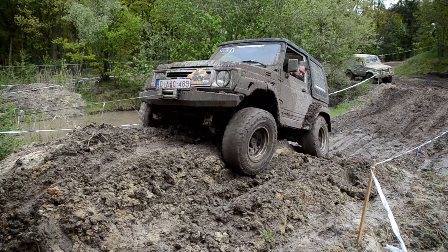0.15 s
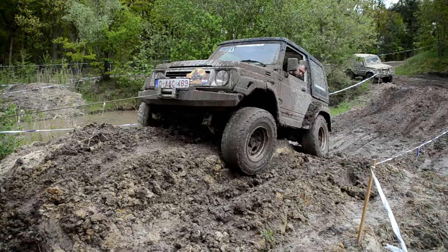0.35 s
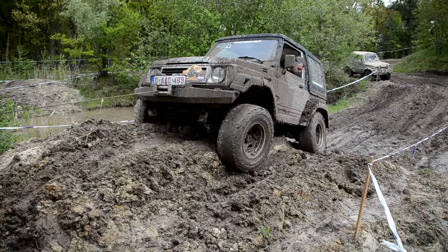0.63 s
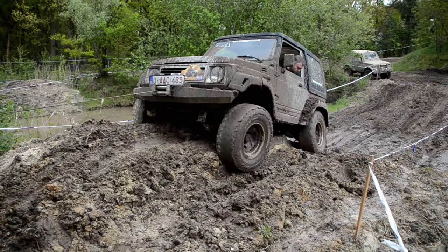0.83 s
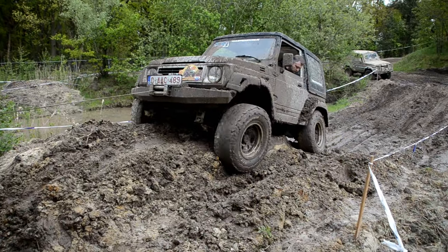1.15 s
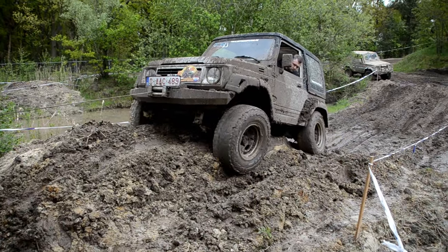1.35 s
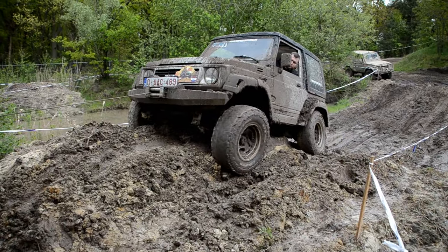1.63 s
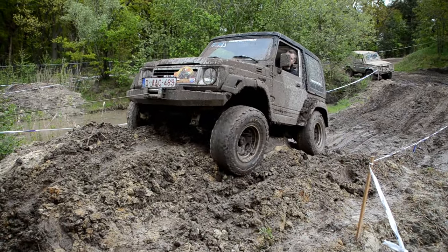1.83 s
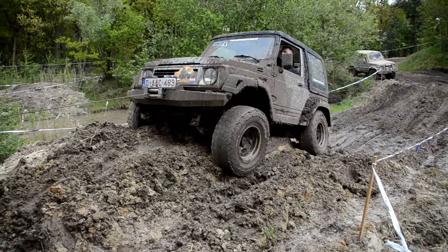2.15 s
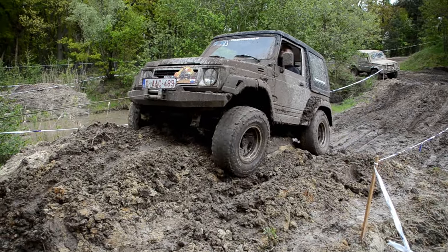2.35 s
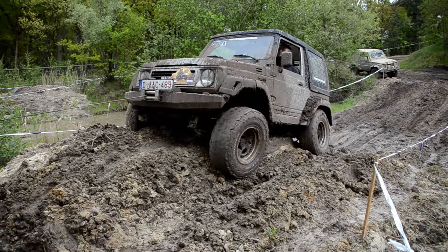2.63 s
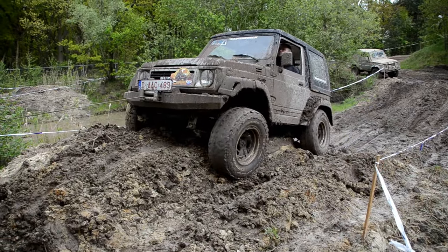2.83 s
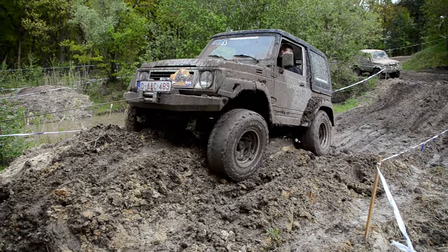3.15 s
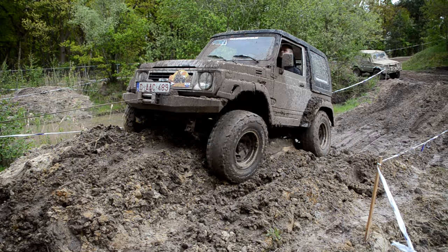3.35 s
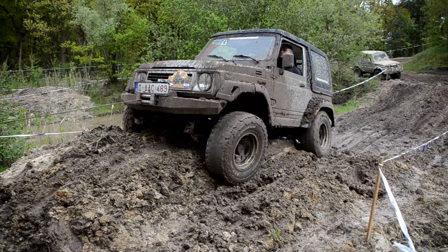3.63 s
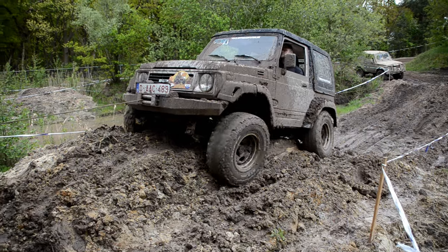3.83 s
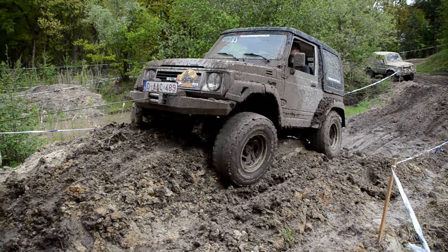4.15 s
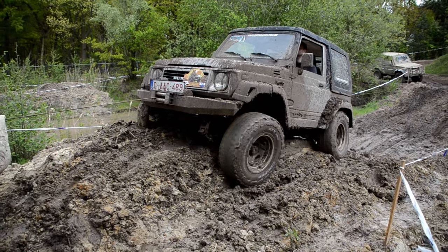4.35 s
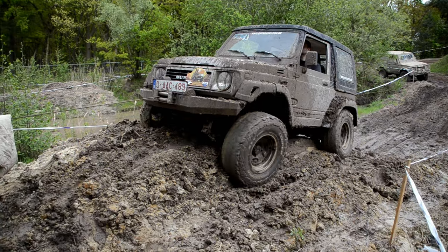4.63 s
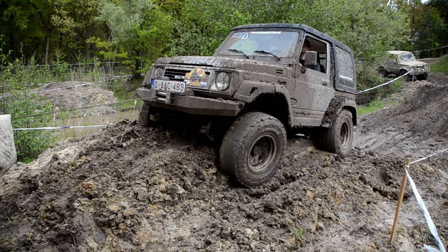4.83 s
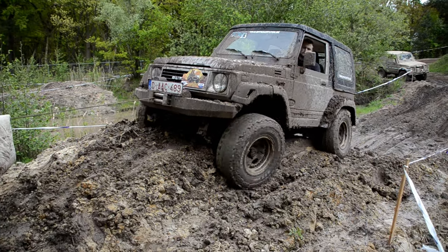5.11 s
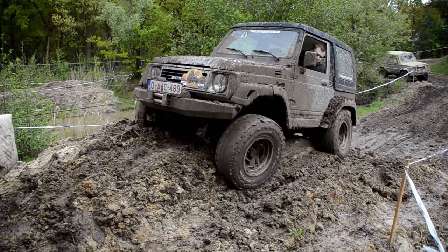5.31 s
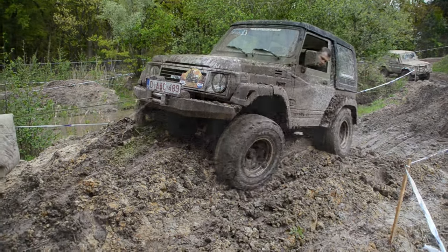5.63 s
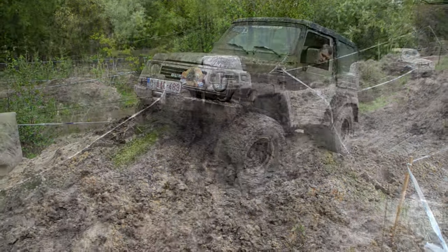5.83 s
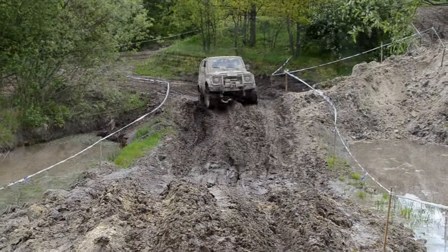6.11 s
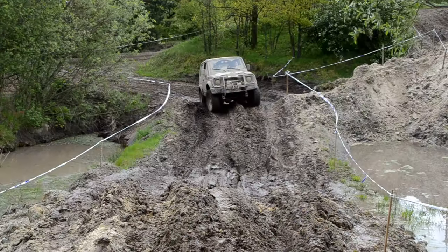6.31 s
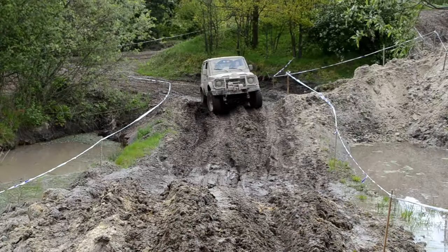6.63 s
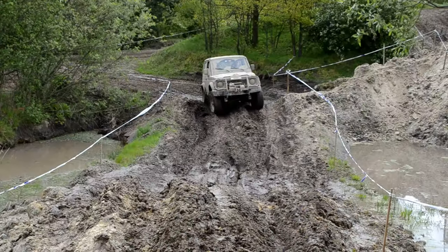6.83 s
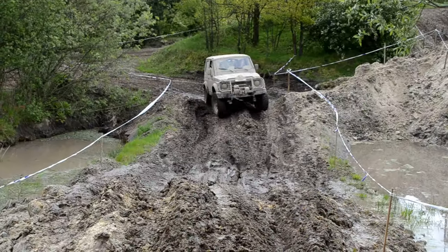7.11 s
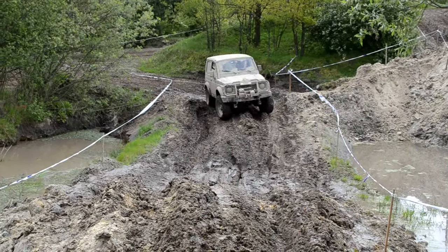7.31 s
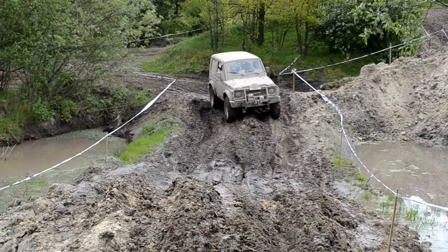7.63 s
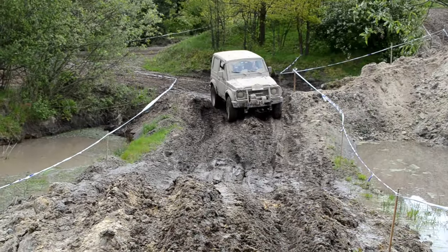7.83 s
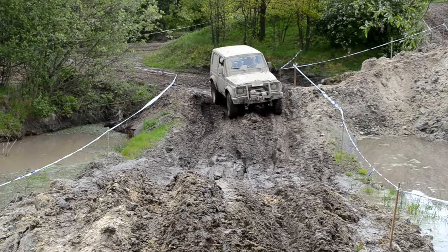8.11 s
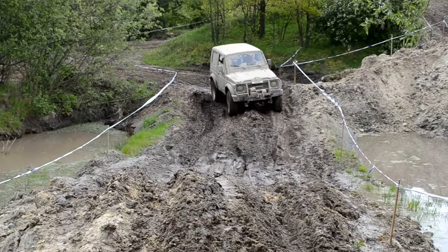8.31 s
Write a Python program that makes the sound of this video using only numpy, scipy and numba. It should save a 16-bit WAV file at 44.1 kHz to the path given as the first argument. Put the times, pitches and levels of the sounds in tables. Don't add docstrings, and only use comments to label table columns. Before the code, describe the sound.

A nearby engine labours on a mud bank, buzzing and clattering with gassy exhaust roar. Crackling pops crowd the first second and a half, then thin out as the pitch sinks and steadies. A thin belt squeal precedes a dissolve to a quieter, more distant vehicle coasting, revving twice with hissing wet mud, easing off and pulling again. Open-air sound through a boxy camera microphone with automatic gain; no speech.

```python
import sys
import numpy as np
from scipy import signal
from scipy.fft import rfft, irfft, next_fast_len
from scipy.io import wavfile
from scipy.ndimage import uniform_filter1d
from numba import njit

SR = 44100
rng = np.random.default_rng(int(sys.argv[2]) if len(sys.argv) > 2 else 0)


def store_pcm(level_fs):
    pcm = np.round(np.clip(level_fs, -1, 1) * 32767).astype(np.int16)
    wavfile.write(sys.argv[1], SR, np.atleast_2d(pcm).T)


def amplitude_ratio(level_db):
    exponent = np.asarray(level_db, float) / 20
    return 10 ** exponent


N = 373527
T = np.arange(N) / SR

# suction_db, suction_place, pressure_db, pressure_place
CYLINDERS = [
    (-2, .38, -12, .05),
    (-6, 1.43, -6, .97),
    (0, 2.4, -14, 2.),
    (-1, 3.47, -5, 3.02),
]


def curves(table):
    s, *columns = np.transpose(table)
    return [np.interp(T, s, c) for c in columns]


def unit(x):
    return x / np.sqrt(np.mean(x ** 2))


def walk(rate):
    hold = int(SR / rate)
    steps = np.repeat(rng.standard_normal(N // hold + 1), hold)
    return 1.3 * uniform_filter1d(uniform_filter1d(steps, hold), hold)[:N]


def band(x, colour, lo_hz, hi_hz):
    # frequency_hz, gain_db
    microphone = [(3700, 3.5), (4200, -3.5), (4800, -16.5), (5300, -11), (6200, -6), (6700, -17),
                  (7100, -26), (8000, -25), (8900, -19), (10000, -25), (12000, -32.5), (16000, -29)]
    size = next_fast_len(N)
    log_hz = np.log(np.maximum(np.arange(size // 2 + 1) * SR / size, 1))
    gain_db = 0
    for response in (colour, microphone):
        hz, db = np.transpose(response)
        gain_db = gain_db + np.interp(log_hz, np.log(hz), db)

    def edge(hz):
        return np.clip((log_hz - np.log(hz)) / 0.3 + 0.5, 0, 1)

    window = np.sqrt(np.maximum(edge(lo_hz) - edge(hi_hz), 0))
    return irfft(rfft(x, size) * amplitude_ratio(gain_db) * window, size)[:N]


def roar(colour, span_hz, gate, flicker_db):
    noise = gate * rng.standard_normal(N)
    lo_hz, hi_hz = span_hz
    hz = np.geomspace(lo_hz, hi_hz, int(2 * np.log2(hi_hz / lo_hz)) + 1)
    return sum(amplitude_ratio(flicker_db * walk(12)) * band(noise, colour, a, b) for a, b in zip(hz, hz[1:]))


def lines(table, orders, rough):
    silencer_hz, silencer_db_per_hz = 74, 0.6
    hz, level_db = curves(table)
    phase = 2 * np.pi * np.cumsum(hz * (1 + 0.0121 * rough * walk(30))) / SR
    start_s, end_s = table[0][0], table[-1][0] + 0.03
    fade = np.clip(np.minimum(T - start_s, end_s - T) / 0.06, 0, 1)
    tones = 0
    for k, db in orders:
        cut_db = silencer_db_per_hz * np.minimum(k * hz - silencer_hz, 0)
        tones = tones + amplitude_ratio(db + cut_db + 2 * rough * walk(13)) * np.sin(k * phase + k * k)
    return np.sqrt(2) * fade * amplitude_ratio(level_db) * tones


def crank_orders(turn, crank_hz, fast):
    # multiple, level_db
    orders_slow = [(.5, -38), (1, -14), (1.5, -25), (2, 0), (2.5, -20), (3, -29), (3.5, -25), (4, -8),
                   (4.5, -27), (5, -6), (5.5, -12), (6, -6), (6.5, -21), (7, -14), (7.5, -10), (8, -8),
                   (8.5, -12), (9, -15), (9.5, -15), (10, -23), (10.5, -24), (11, -12), (11.5, -13),
                   (12, -14)]
    # multiple, level_db
    orders_fast = [(0.5, -36), (1, -13), (1.5, -22), (2, 0), (2.5, -24), (3, -12), (3.5, -21), (4, -17),
                   (4.5, -21), (5, 0), (5.5, -19), (6, -12), (6.5, -18), (7, -9), (7.5, -19), (8, -7),
                   (8.5, -15), (9, -13), (9.5, -21), (10, -16), (10.5, -23), (11, -19), (11.5, -16),
                   (12, -18)]
    # centre_hz, width_hz, lift_db
    pipes = [
        (650, 21, 2),
        (548, 30, 6.5),
    ]
    suck_db, suck_at, push_db, push_at = np.transpose(CYLINDERS)
    tones = 0
    for (k, slow_db), (_, fast_db) in zip(orders_slow, orders_fast):
        pressure = amplitude_ratio(push_db) * np.exp(-1j * k * np.pi * push_at)
        suction = amplitude_ratio(suck_db) * np.exp(-1j * k * np.pi * suck_at)
        start_phase = np.angle((pressure - suction).sum())
        wobble = min(k / 8, 1)
        db = slow_db + fast * (fast_db - slow_db) + (0.3 + 1.3 * wobble) * walk(9)
        for hz, width, lift in pipes:
            db = db + lift * np.exp(-((k * crank_hz - hz) / width) ** 2)
        tones = tones + amplitude_ratio(db) * np.cos(k * turn + start_phase + 0.25 * wobble * walk(11))
    return tones


def gear_whine(turn, crank_hz):
    teeth, case_hz, case_width_hz, whine_db = 20, 1314, 24, -26
    resonance = np.exp(-((teeth * crank_hz - case_hz) / case_width_hz) ** 2)
    return amplitude_ratio(whine_db + 3 * walk(25)) * resonance * np.sin(teeth * turn + 0.5 * walk(30))


def blows(turn, scatter_db, jitter):
    # frequency_hz, level_db
    blow_colour = [(600, -5), (680, 6.5), (760, -3), (860, 4.5), (1000, -18), (1200, 4), (1450, -1.5),
                   (1800, -8.5), (2200, -21)]
    count = np.arange(4, int(turn[-1] / np.pi) - 4)
    blow_db, late = np.array(CYLINDERS)[count % 4, :2].T
    lag_chance, size_chance = rng.standard_normal((len(count), 2)).T
    angle = np.pi * (count - count % 4 + late + jitter * lag_chance)
    place = np.interp(angle, turn, np.arange(N))
    size = amplitude_ratio(blow_db + scatter_db * size_chance)
    whole, part = place.astype(int), place % 1
    pulses = np.bincount(whole, size * (1 - part), N) + np.bincount(whole + 1, size * part, N)
    t = np.arange(int(0.007 * SR)) / SR
    rattle = signal.chirp(t, 2700, t[-1], 400) * signal.windows.tukey(len(t), 0.2)
    return unit(band(signal.fftconvolve(pulses, rattle)[:N], blow_colour, 530, 3100))


def panels(gate):
    # centre_hz, width_hz, level_db
    modes = [(856, 87, -16), (1200, 46, -19.5), (1414, 60, -14.5), (1543, 62, -18), (1833, 81, -17),
             (3647, 90, -27)]
    shake = gate * rng.standard_normal(N)
    hum = 0
    for hz, width, db in modes:
        b, a = signal.iirpeak(hz, hz / width, SR)
        ring = signal.lfilter(b, a, signal.lfilter(b, a, shake))
        hum = hum + amplitude_ratio(db + 3.2 * walk(2.9)) * unit(ring)
    return hum


def near_engine():
    # time_s, crank_hz, load_db
    near = [(0.0, 60.9, -20.5), (0.5, 62.72, -22.5), (0.78, 65.1, -18.5), (1.05, 66.02, -16),
            (1.31, 59.48, -21.5), (1.6, 54.73, -21), (1.85, 52.8, -19.5), (2.28, 53.78, -20.5),
            (2.47, 54.37, -16.5), (2.86, 54.46, -17), (3.3, 55.28, -18.5), (3.75, 55.62, -17),
            (4.13, 54.95, -20), (4.4, 55.15, -20.5), (4.65, 54.42, -19), (4.9, 55.3, -20.5),
            (5.28, 57.85, -20), (6.2, 59, -21)]
    # frequency_hz, level_db (per Hz)
    near_colour = [(30, -22), (45, -29), (110, -11), (167, -19.5), (210, -14), (330, -12), (430, -7.5),
                   (600, -8), (780, -12.5), (1420, -17), (2130, -19.5), (3660, -27), (6000, -28),
                   (16000, -30.5)]
    slow_hz, fast_hz, idle_load_db = 55.8, 64.4, -20
    crank_hz, tone_db = curves(near)
    turn = 2 * np.pi * np.cumsum(crank_hz * (1 + 0.002 * walk(25))) / SR
    fast = np.clip((crank_hz - slow_hz) / (fast_hz - slow_hz), 0, 1)
    load_db = tone_db - idle_load_db
    roar_db = -24 + 0.43 * load_db + 2.5 * fast
    hiss_db = -34.5 + 0.72 * load_db + 0.7 * fast
    tones = amplitude_ratio(tone_db) * crank_orders(turn, crank_hz, fast) + gear_whine(turn, crank_hz)
    gate = 1 + 0.17 * np.cos(2 * turn - 2.6) + 0.16 * np.cos(turn)
    low = amplitude_ratio(-3.5) * unit(roar(near_colour, (25, 700), gate, flicker_db=1.5))
    mid = amplitude_ratio(-3.0) * unit(roar(near_colour, (700, 2200), gate, flicker_db=0.4))
    mid = mid + amplitude_ratio(-5) * blows(turn, scatter_db=2.5, jitter=0.008)
    mid = mid + panels(gate)
    high = unit(roar(near_colour, (2200, 17000), gate, flicker_db=1.0))
    return np.sqrt(2) * tones + amplitude_ratio(roar_db + 3.0) * (low + mid) + amplitude_ratio(hiss_db + 2.0) * high


def pops():
    # start_s, crack_db, body_db (relative to crack)
    bursts = [(0.0672, -36, -7), (0.131, -25.5, 6.5), (0.177, -34.5, 12), (0.2069, -30.5, 10),
              (0.272, -27.5, 9.5), (0.3948, -28.5, 11.5), (0.4193, -35.5, 9), (0.5237, -33, 6.5),
              (0.5735, -38, 7), (0.6225, -31, 9), (0.6644, -34, 1), (0.784, -31.5, 9), (0.825, -31, 9.5),
              (0.8622, -30.5, 18), (0.936, -28.5, 1), (1.0303, -32, 13.5), (1.044, -21.5, 4.5),
              (1.0814, -33, 11), (1.1263, -24.5, 3), (1.1797, -31.5, 16.5), (1.3606, -24, 4.5),
              (1.4063, -32.5, 6), (1.5204, -39, 16), (1.6337, -37, 14), (1.652, -29.5, 16),
              (2.0068, -32.5, 17), (4.1441, -24, 12.5), (5.527, -24, 6.5), (5.5777, -40, 9),
              (6.785, -55, 21)]
    # frequency_hz, level_db (per Hz)
    pop_colour = [(400, 7), (900, 12), (1700, 13.5), (3000, 0.5), (6000, 0), (10000, 8), (16000, -1)]
    thump_db, thump_per_size = -8, 0.9
    hz = np.geomspace(400, 17000, 9)
    t = np.arange(int(0.08 * SR)) / SR
    out = 0
    for lo, hi in zip(hz, hz[1:]):
        envelope = np.zeros(N)
        late_s, decay_s = 4.0 / lo, 0.0008 + 3.0 / lo
        burst = 1.8 * (1 - np.exp(-4 * t / decay_s)) * np.exp(-t / decay_s / 1.3)
        shape = burst + 0.24 * np.exp(-t / 0.011)
        for s, crack_db, body_db in bursts:
            low_db = body_db + thump_db + thump_per_size * (crack_db + 36)
            db = np.interp(np.log(lo), np.log([900, 3000, 7000]), [low_db - 16, body_db - 11, 0])
            i = int((s + late_s - 0.0004) * SR)
            envelope[i:i + len(t)] += amplitude_ratio(crack_db + db) * shape
        out = out + band(envelope * rng.standard_normal(N), pop_colour, lo, hi)
    return amplitude_ratio(15.5) * out


def belt_squeal():
    # time_s, pitch_hz, level_db
    squeal = [
        (4.67, 650.6, -53),
        (4.8, 652, -59),
        (5.02, 660, -53.5),
        (5.2, 631.9, -56),
    ]
    # multiple, level_db
    squeal_orders = [(8, 0), (9, 2), (10, -4)]
    return lines(squeal, squeal_orders, rough=0.15)


def far_roar():
    # time_s, effort_db
    far = [(5.6, -8), (6.09, 0), (6.27, 4.5), (6.48, 2), (6.68, 1), (6.84, 3), (7.0, -0.5), (7.2, -3),
           (7.9, -3.5), (8.1, -.5), (8.47, 2.5)]
    # frequency_hz, level_db (per Hz)
    far_colour = [(25, -26), (45, -24), (70, -3), (90, -9.5), (230, -9.5), (540, -12.5), (1000, -16),
                  (1900, -24.5), (2300, -25.5), (3500, -39), (4300, -31), (5800, -38.5), (7500, -29),
                  (16000, -50)]
    # low_hz, high_hz, level_db, slope (dB per dB of effort), flicker_db
    layers = [
        (20, 556.4, -31, 1.2, 1.5),
        (551, 1100, -31.5, 1.15, 0.5),
        (1102, 2200, -30.5, 0.77, 1.),
        (2260, 5240, -40, 1, .6),
        (4785, 19000, -60.5, 1, 1.5),
    ]
    spray_s, spray_width_s, spray_db = 6.32, 0.26, -51
    effort_db, = curves(far)
    gate = amplitude_ratio(0.88 * walk(150))
    noise = 0
    for lo, hi, db, slope, flicker_db in layers:
        noise = noise + amplitude_ratio(db + slope * effort_db) * unit(roar(far_colour, (lo, hi), gate, flicker_db))
    spin = np.exp(-((T - spray_s) / spray_width_s) ** 2)
    spray = spin * unit(roar(far_colour, (4000, 11000), gate, flicker_db=1.2))
    return noise + amplitude_ratio(spray_db) * spray


def far_tones():
    # time_s, pitch_hz, level_db
    coasting = [
        (5.95, 238, -37),
        (6.1, 235.6, -32),
        (6.25, 217, -36),
    ]
    # time_s, firing_hz, level_db
    blip_a = [
        (6.1, 58, -40),
        (6.2, 70, -30),
        (6.3, 79.7, -24.5),
        (6.47, 82, -25.5),
        (6.63, 78.2, -26.5),
        (6.74, 73.1, -33),
        (6.9, 70.1, -31),
        (7.02, 64.8, -31.5),
        (7.25, 58, -44),
    ]
    # time_s, firing_hz, level_db
    blip_b = [
        (6.62, 70.1, -45),
        (6.8, 76.9, -33),
        (6.89, 79, -30),
        (6.97, 74.6, -32),
        (7.1, 62.2, -60),
    ]
    # time_s, pitch_hz, level_db
    squeak = [
        (6.76, 1300, -36),
        (6.85, 1345, -36),
        (6.93, 1375, -44),
    ]
    # time_s, pitch_hz, level_db
    gears = [
        (6.9, 890, -41),
        (7.03, 775, -33),
        (7.13, 712, -36),
    ]
    # time_s, firing_hz, level_db
    blip_c = [
        (7.95, 117, -44),
        (8.04, 109.7, -36.5),
        (8.25, 112.2, -39.5),
        (8.36, 124.7, -34),
        (8.47, 130, -43),
    ]
    # multiple, level_db
    loaded = [(1, 1.5), (2, -5.5), (3, -12.5), (4, -13)]
    revved = [(2, -11), (3, 1), (4, -5), (5, -7)]
    pulling = [(1, -9), (2, 1), (3, -7), (4, -12)]
    tones = lines(coasting, [(1, 0)], rough=0.6)
    tones = tones + lines(blip_a, loaded, rough=0.6)
    tones = tones + lines(blip_b, revved, rough=0.6)
    tones = tones + lines(squeak, [(1, 0), (1.37, -4)], rough=0.5)
    tones = tones + lines(gears, [(1, 0)], rough=0.8)
    return tones + lines(blip_c, pulling, rough=0.9)


def scene():
    dissolve_start_s, dissolve_end_s = 5.365, 6.22
    share = np.clip((T - dissolve_start_s) / (dissolve_end_s - dissolve_start_s), 0, 1)
    near = near_engine() * (1 - share) ** 0.79 + pops() + belt_squeal()
    return (near + far_roar() * share + far_tones())[None]


@njit
def limiter(x, top, attack, release):
    gain, e = np.empty(len(x)), 0.
    for i in range(len(x)):
        e += (abs(x[i]) - e) * (attack if abs(x[i]) > e else release)
        gain[i] = min(1., top / (e + 1e-9))
    return gain


def low_pass(x):
    return signal.sosfilt(signal.butter(12, 15830, fs=SR, output="sos"), x)


def record(dry):
    limit_db, attack_s, release_s = -11.5, 0.006, 0.049
    dry = dry + amplitude_ratio(-68) * rng.standard_normal(N)
    gain = limiter(dry[0], amplitude_ratio(limit_db), 1 / (attack_s * SR), 1 / (release_s * SR))
    mix = np.tanh(dry * gain / 2) * 2
    return low_pass(mix)


dry = scene()
out = record(dry)
store_pcm(out)
```